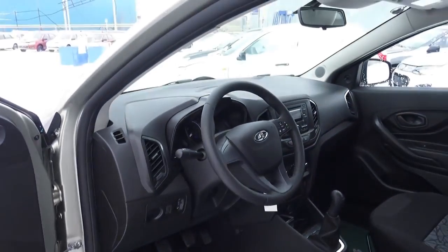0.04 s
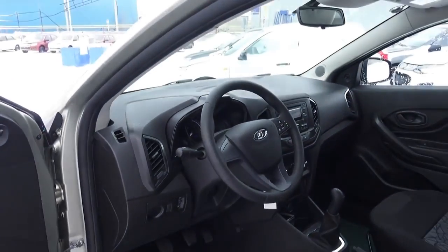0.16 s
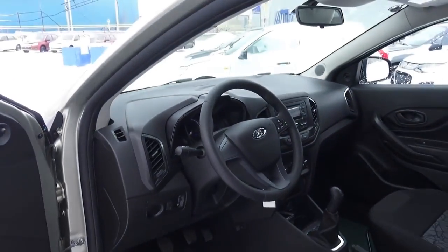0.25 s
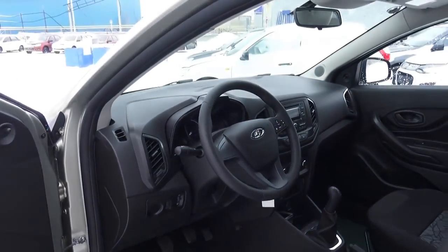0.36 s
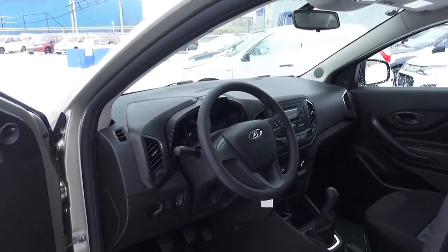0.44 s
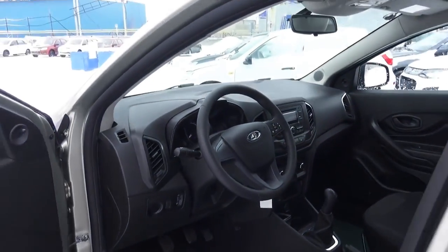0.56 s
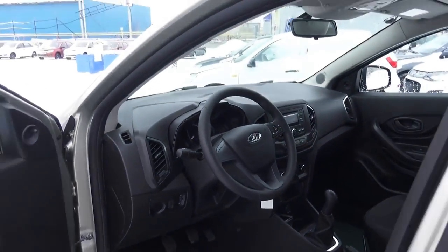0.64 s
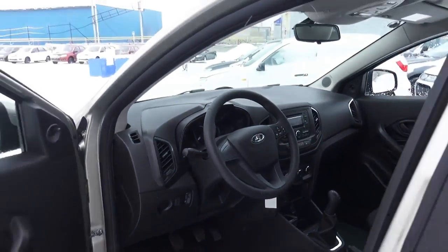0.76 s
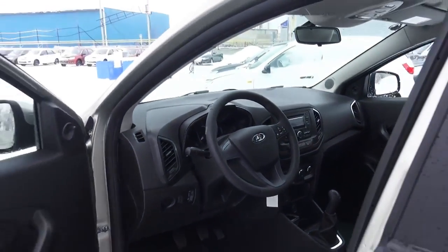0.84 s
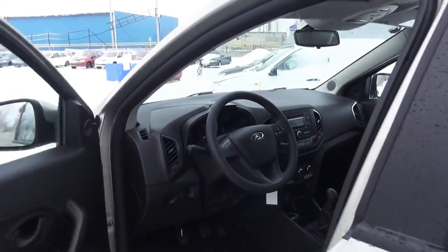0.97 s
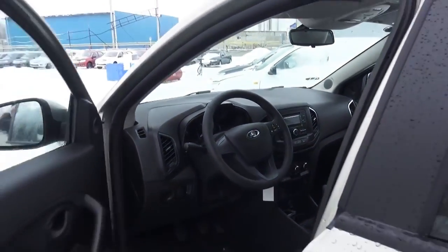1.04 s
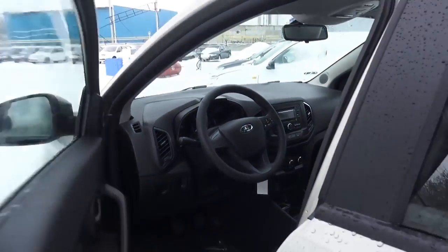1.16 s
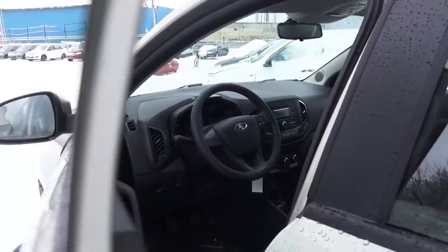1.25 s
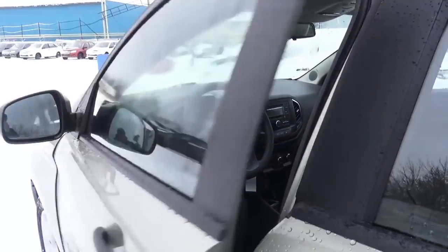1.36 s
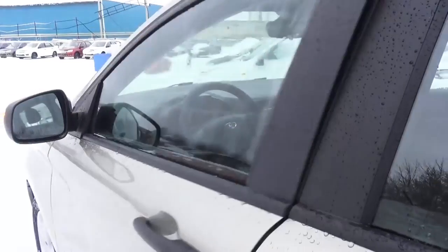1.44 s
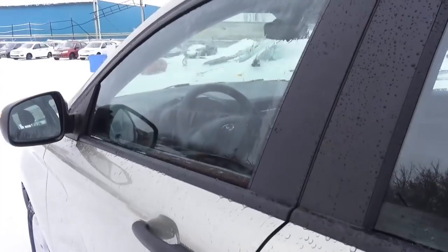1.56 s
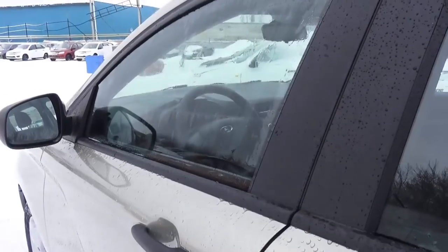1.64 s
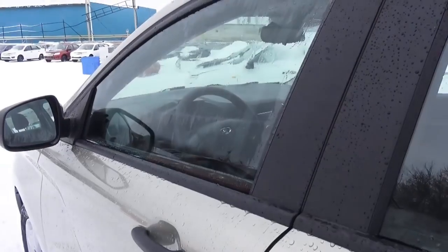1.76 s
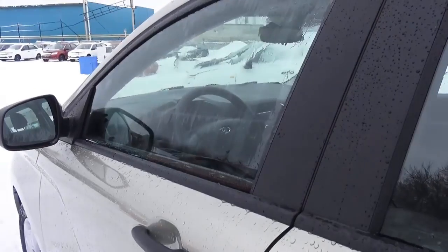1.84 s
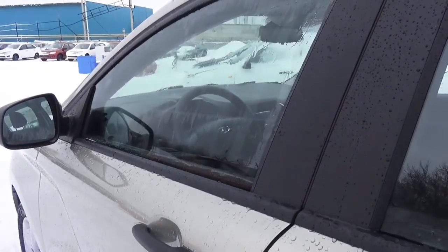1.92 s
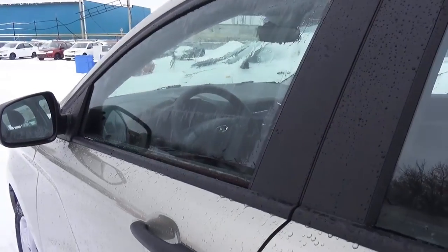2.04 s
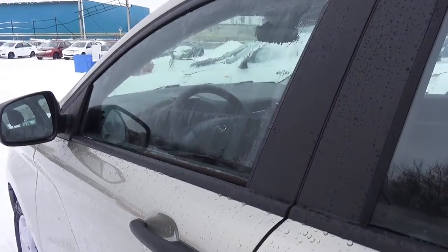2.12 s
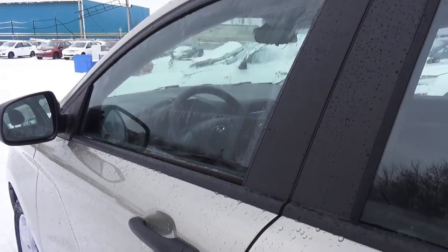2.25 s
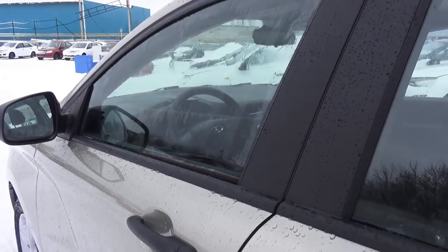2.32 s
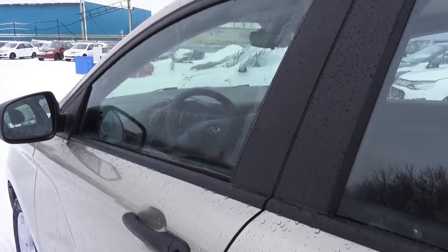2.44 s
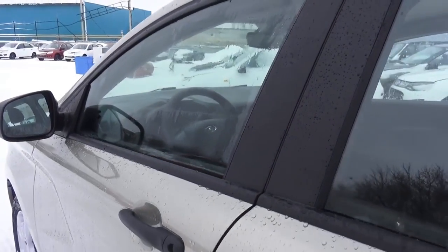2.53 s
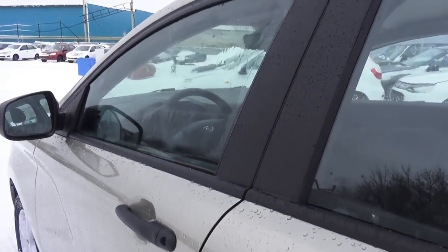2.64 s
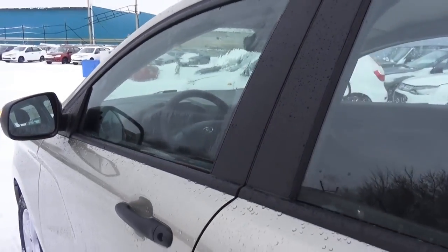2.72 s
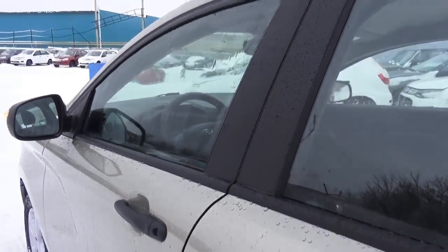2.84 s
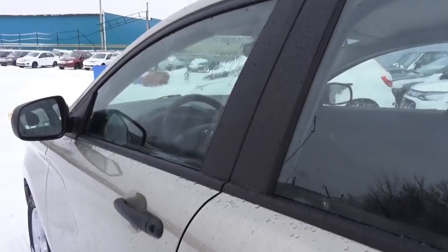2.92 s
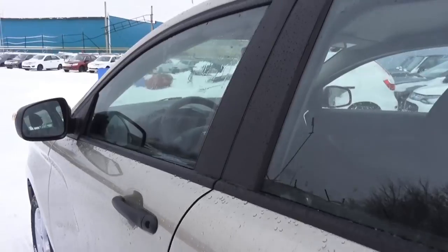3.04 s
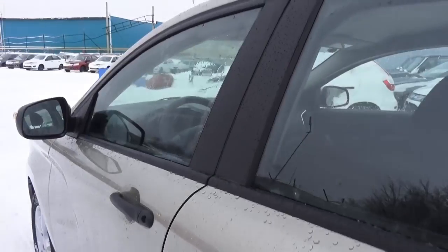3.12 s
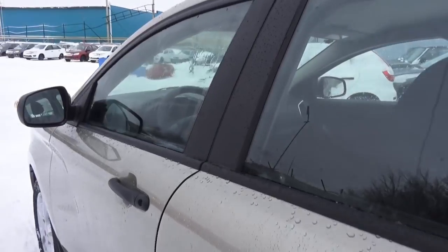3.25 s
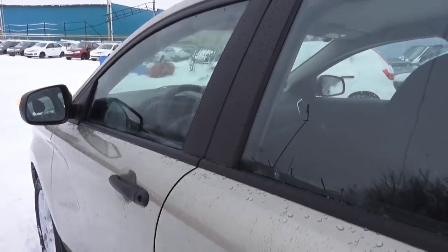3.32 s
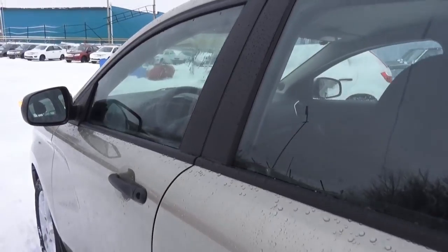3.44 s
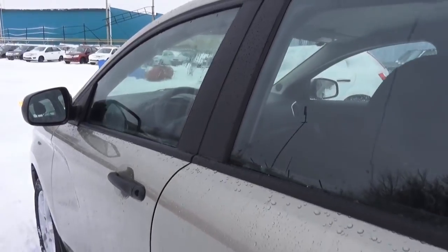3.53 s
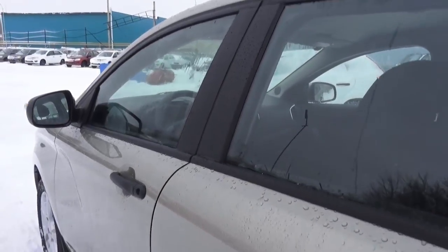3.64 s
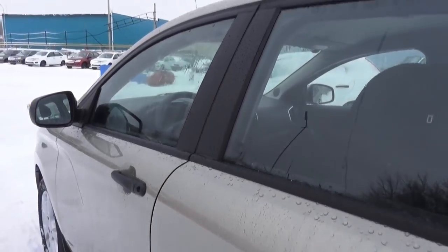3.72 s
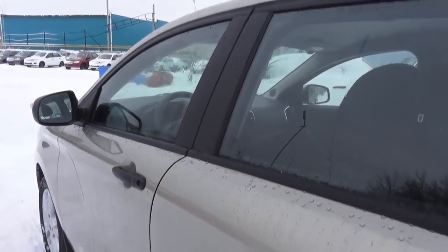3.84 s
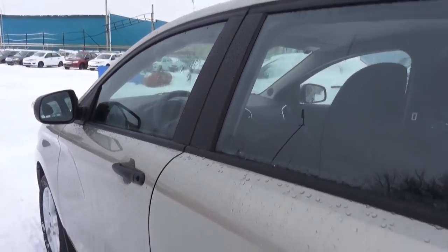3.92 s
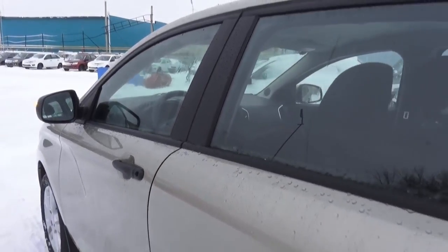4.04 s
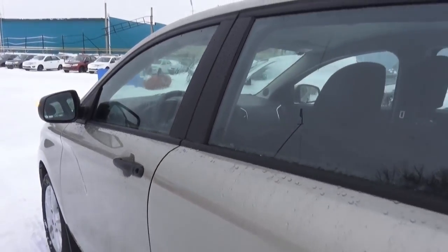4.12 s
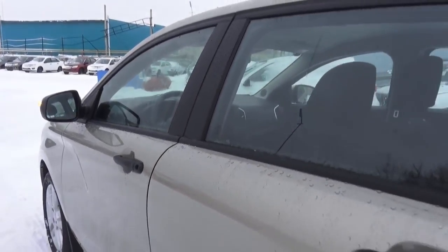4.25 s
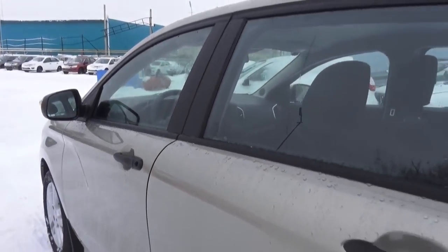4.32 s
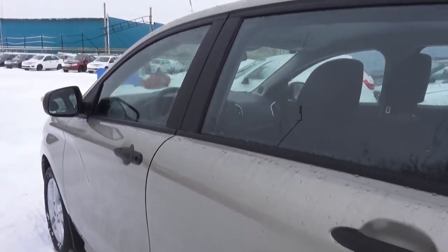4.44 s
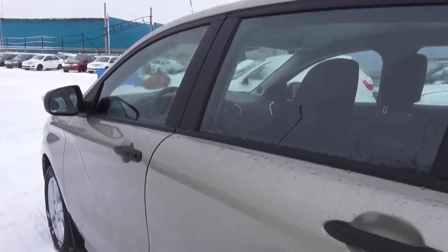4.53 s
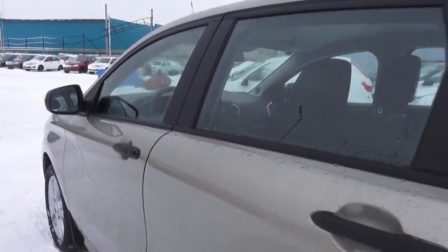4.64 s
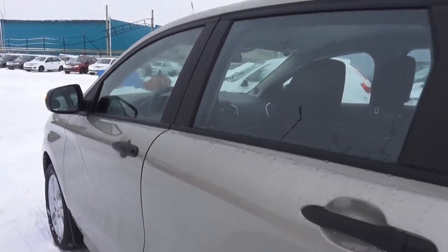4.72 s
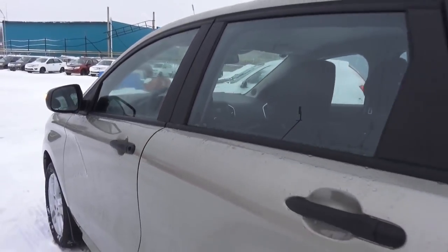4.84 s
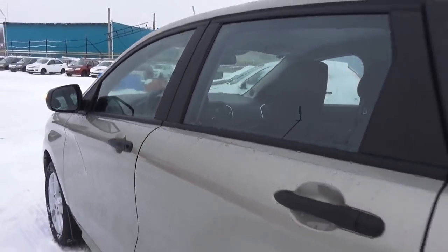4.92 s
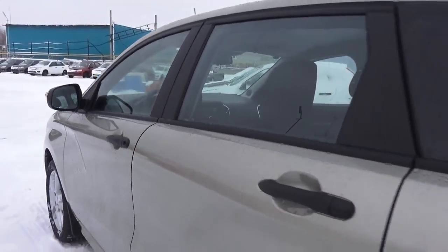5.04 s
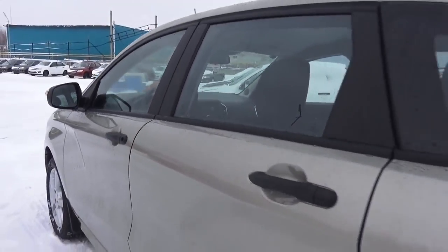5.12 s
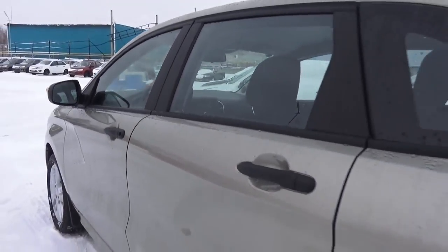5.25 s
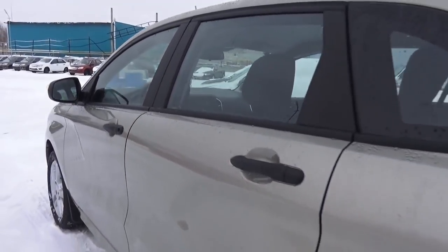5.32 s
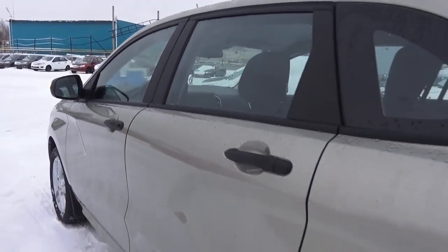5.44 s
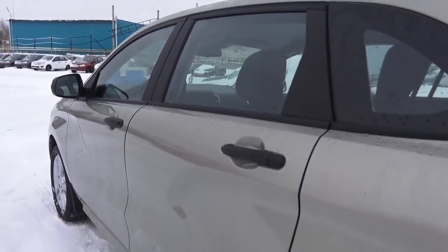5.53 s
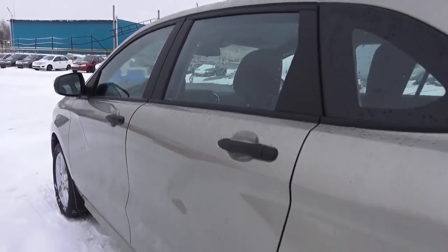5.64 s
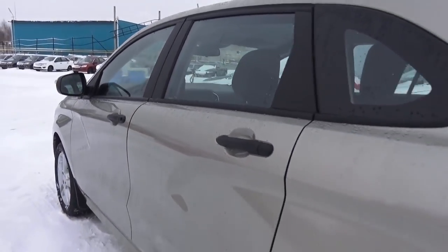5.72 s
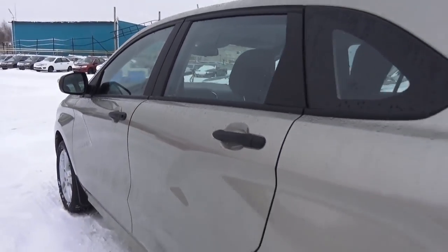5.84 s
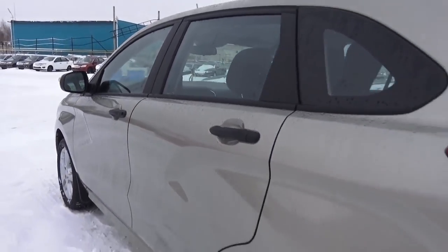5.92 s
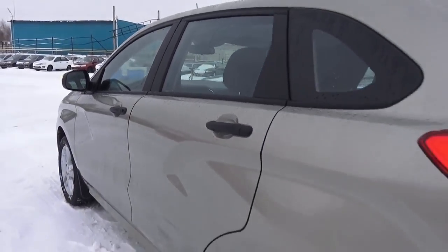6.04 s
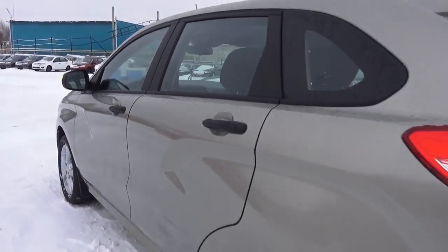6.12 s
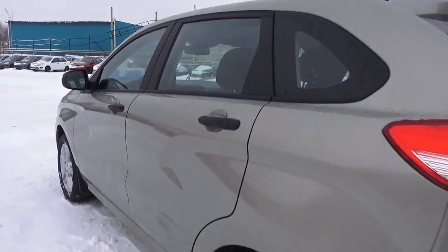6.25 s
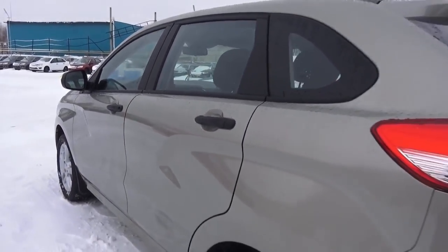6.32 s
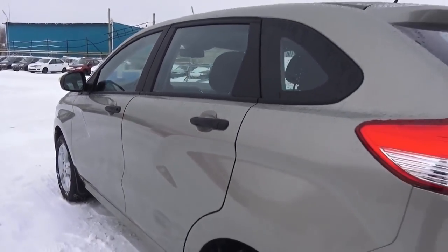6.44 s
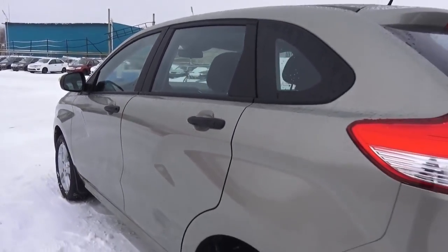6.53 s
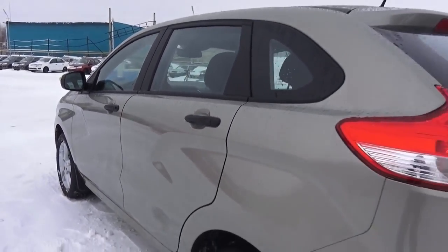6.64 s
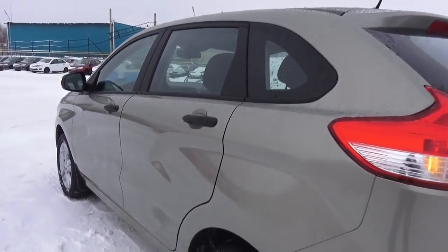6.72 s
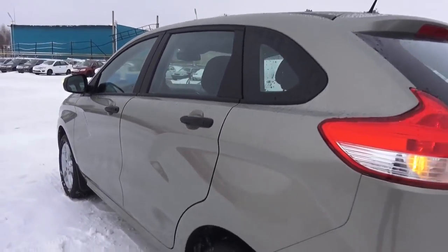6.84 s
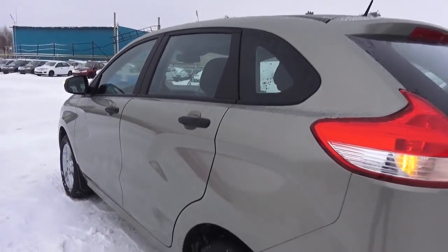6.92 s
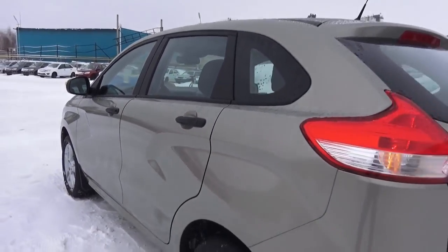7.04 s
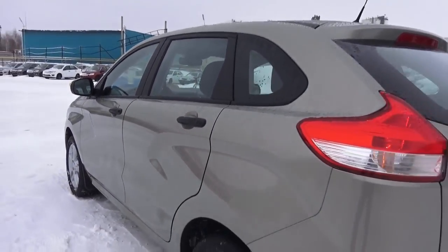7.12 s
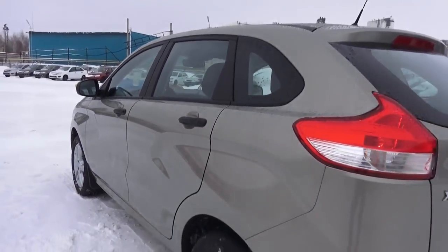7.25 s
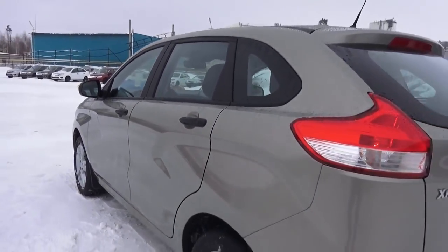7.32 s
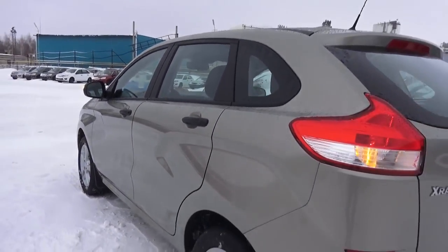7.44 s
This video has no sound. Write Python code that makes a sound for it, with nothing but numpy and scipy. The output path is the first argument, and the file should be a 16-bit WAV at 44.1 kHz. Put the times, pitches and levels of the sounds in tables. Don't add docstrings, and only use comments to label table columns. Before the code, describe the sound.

Steady low engine idle, a knocking door hinge and solid car door slam, then a slow walk along the car with gusts buffeting the microphone.

```python
import sys
import numpy as np
from scipy import signal
from scipy.fft import rfft, irfft, next_fast_len
from scipy.io import wavfile
from scipy.ndimage import map_coordinates

SR = 44100
rng = np.random.default_rng(int(sys.argv[2]) if len(sys.argv) > 2 else 0)


def store_wav(level_fs):
    pcm = np.round(np.clip(np.atleast_2d(level_fs), -1, 1) * 32767)
    wavfile.write(sys.argv[1], SR, pcm.T.astype(np.int16))


def ratio(d):
    e = np.asarray(d, float) / 20
    return 10 ** e


N = 329868
SIDES = np.array([[1], [-1]])


def unit(x):
    return x / np.sqrt(np.mean(x ** 2) + 1e-20)


def panned(left_right_db):
    return ratio(np.outer([0.5, -0.5], left_right_db))


def along(points, hz):
    f, v = np.transpose(points)
    return np.interp(np.log(hz + 1), np.log(f + 1), v)


def curves(rows):
    s, *cols = np.transpose(rows)
    return [np.interp(np.arange(N) / SR, s, c) for c in cols]


def wobble(rate):
    coarse = np.arange(0, N + 64, 32)
    knots = rng.standard_normal(int(N * rate / SR) + 6)
    return np.interp(np.arange(N), coarse, map_coordinates(knots, [coarse * rate / SR]))


def filtered(x, response):
    m = next_fast_len(N + 8192)
    return irfft(rfft(x, m) * response(np.fft.rfftfreq(m, 1 / SR)), m)[..., :N]


def resonance(hz, center_hz, width_hz):
    damping = 1j * hz * width_hz
    return damping / (center_hz ** 2 - hz ** 2 + damping)


# freq_hz, likeness (0 to 1)
PORT_LIKENESS = [(60, 1), (130, 0.92), (270, 0.92), (450, 0.94), (740, 0.87), (1300, 0.9), (1800, 0.9),
                 (2100, 0.97), (4400, 0.95), (5300, 0.44), (6500, 0.072), (9000, 0.18), (15000, 0.22)]


def rush(spectrum, gate=1):
    def response(hz):
        turn = np.arccos(np.clip(along(PORT_LIKENESS, hz), -1, 1)) / 2
        return ratio(along(spectrum, hz)) * [np.cos(turn), np.sin(turn)]

    mid, side = filtered(gate * rng.standard_normal((2, N)), response)
    return unit(np.array([mid + side, mid - side]))


def add(track, s, sound):
    part = track[..., round(s * SR):][..., :sound.shape[-1]]
    part += sound[..., :part.shape[-1]]


def ring(modes, attack, scatter_db):
    hz, db, t60 = np.transpose(modes)[:, :, None]
    t = np.arange(int(SR * t60.max())) / SR
    luck = rng.standard_normal((2, len(modes), 1))
    decay = ratio(db + scatter_db * luck[0] - 60 * t / t60)
    tones = decay * np.sin(2 * np.pi * hz * t + 0.92 * luck[1])
    return tones.sum(axis=0) * (1 - np.exp(-t / attack))


def swings(rows):
    s, db, hz, width = np.transpose(rows)[:, :, None]
    t = np.arange(-SR // 10, SR // 10) / SR
    bells = ratio(db) * np.exp(-.5 * (t / width) ** 2)
    out = np.zeros(N + SR)
    for at, swing in zip(s[:, 0], bells * np.cos(2 * np.pi * hz * t)):
        add(out, at, swing)
    return out[SR // 10:][:N]


# time_s, tailpipe_db, engine_bay_db, silencer_ring_db, tailpipe_left_right_db
WALK = [(0, -26, -43.5, -50, -.5), (.5, -25, -42.5, -56, 0), (.85, -23, -42.5, -46, -1),
        (1.3, -23.5, -42.5, -46, 0), (1.5, -22.5, -40.5, -48, 0), (1.95, -22.5, -42.5, -51, -0.5),
        (2.35, -22, -41.5, -52, 0.5), (2.75, -21, -41.5, -47, -0.2), (3.25, -21.5, -40, -46.5, .4),
        (3.7, -21, -40.5, -53, 0.5), (4.1, -20.5, -40, -47, 0.7), (4.7, -19.5, -39, -42.5, -0.5),
        (5.6, -19, -43, -50, -1.1), (6.1, -19.5, -43.5, -42, 0.5), (6.45, -21.5, -45, -45.5, -1),
        (6.65, -21.5, -43, -54, 1.5), (7.0, -21, -44, -46.5, -1), (7.48, -21, -45, -46, 1)]
# multiple_of_firing, level_db re second order
UPPER_ORDERS = [(4, -27), (5, -37.5), (6.5, -27)]
# freq_hz, density_db
ROAR = [(15, 0), (60, 1), (130, 1), (300, -1.5), (380, -1), (440, -5.5), (550, -4), (615, 1.5), (670, -9),
        (1000, -8), (1200, -40)]
# freq_hz, density_db
CLATTER = [(700, -33), (1100, -1), (1250, -0.5), (1330, 0), (1480, -5.5), (1650, -9), (2500, -16),
           (3700, -23), (4800, -49)]
# freq_hz, density_db
HISS = [(1300, -6), (2200, 0.5), (3600, -2.5), (4800, -10), (7000, -13.5), (7400, -8.5), (7750, -14.5),
        (9000, -14), (12000, -24.5), (14000, -32), (16000, -36)]
# freq_hz, width_hz, level_db
VALVE_COVER = [(1252, 43, 2), (1320, 40, -3.5), (1390, 48, -1.5)]
# freq_hz, width_hz, level_db
SILENCER = [(378, 14, -2), (606, 19, 5), (640, 46, -9.5)]


def engine():
    hum_db, bay_db, silencer_db, pan_db = curves(WALK)
    pipe, bay = hum_db + 21.5, bay_db + 42
    second_order_hz = 55.93
    turn = np.pi * np.cumsum(second_order_hz * (1 + 0.0038 * wobble(7.17))) / SR
    uneven = 1.1 * wobble(8)
    orders = np.sin(2 * turn)
    orders += ratio(-18.5 + 1.3 * uneven) * np.sin(turn)
    orders += ratio(-19.5 + 2.7 * wobble(6.0)) * np.sin(3 * turn)
    for k, db in UPPER_ORDERS:
        orders += ratio(db + uneven) * np.sin(k * turn)
    hum = np.sqrt(2) * ratio(hum_db + 0.32 * wobble(15)) * orders * panned(pan_db)

    def puff(depth_db, luck_db):
        return ratio(depth_db * np.cos(turn + 1.3) + luck_db * wobble(30))

    roar = ratio(-36 + 0.44 * bay + 0.26 * pipe) * rush(ROAR, puff(0.29, 0.78))
    clatter = ratio(bay_db - 2.5 - 0.05 * pipe) * rush(CLATTER, puff(0.72, 0.88))
    hiss = ratio(-49 + 0.75 * pipe + 0.14 * bay + 1.36 * wobble(6.4)) * rush(HISS, puff(0.14, 0.29))

    knocks = puff(2.0, 2.9) * rng.standard_normal(N)

    def rung(modes):
        return unit(filtered(knocks, lambda f: sum(ratio(db) * resonance(f, c, w) for c, w, db in modes)))

    metal = ratio(bay_db - 5) * rung(VALVE_COVER) + ratio(silencer_db) * rung(SILENCER)
    metal = metal + 0.18 * np.roll(metal, round(0.0007 * SR)) * SIDES
    return hum + roar + clatter + hiss + metal


# time_s, peak_db, bright_modes_db
STRAP_KNOCKS = [(1.068, -14, 3.5), (1.078, -18, 1), (1.089, -16, 4), (1.099, -16, 2), (1.118, -14.5, -3),
                (1.14, -20, 3), (1.152, -19, -2), (1.179, -22, -2), (1.196, -23, -2), (1.208, -23.5, 1),
                (1.234, -26, 2), (1.274, -24, -7), (1.300, -27, -2), (1.339, -27, 1), (1.363, -30, 6),
                (1.377, -31, 5), (1.397, -32, 1), (4.825, -24, -2)]
# freq_hz, level_db, t60_s
DOOR_SKIN = [(144, -5, 0.13), (184.6, 0, 0.14), (217, -5, 0.057), (273.5, 2.5, 0.1), (345, -6, 0.082),
             (394, -6.5, 0.083), (502, 1.5, 0.066), (560, 0.5, 0.057), (620, -2, 0.044), (720, -14, .03),
             (800, -24, .03)]
# time_s, peak_db, freq_hz, width_s
DRUMMING = [(1.0718, -14.5, 570, .004), (1.0718, -15.5, 284, .005), (1.083, -16, 170, 0.0054),
            (1.0875, -16, 235, 0.0042), (1.0915, -15, 480, 0.004), (1.0955, -13, 277, 0.0063),
            (1.1022, -12, 528, .0045), (1.113, -21, 403, .005), (1.121, -23, 230, 0.0067),
            (1.1085, -14, 185, .007), (1.118, -19, 160, .006), (1.078, -24, 720, .003),
            (1.124, -24, 450, .004), (1.128, -21, 130, .008), (1.1435, -24.5, 570, .0035),
            (1.158, -33, 597, 0.0074), (1.18, -31, 560, 0.0046), (1.205, -31, 535, .007),
            (1.279, -26, 300, 0.0075), (1.365, -33, 700, 0.0062), (1.379, -30, 430, 0.0055)]


def check_strap():
    strap = swings(DRUMMING)
    for s, db, bright_db in STRAP_KNOCKS:
        modes = [(hz, level + bright_db * (hz > 380), t60) for hz, level, t60 in DOOR_SKIN]
        add(strap, s, ratio(db - 8.5) * ring(modes, attack=0.0021, scatter_db=1.5))
    return strap


# time_s, level_db
PAWL_CATCHES = [
    (1.5188, -16.5),
    (1.5228, -17),
    (1.529, -19.5),
    (1.5433, -24),
]
# freq_hz, level_db, t60_s
PAWL = [(1250, -3.5, 0.024), (1383, 2, 0.031), (1530, -6, 0.038), (1750, -23, 0.025)]
# time_s, level_db
SHELL_BLOWS = [(1.507, -23), (1.529, -15), (1.548, -15), (1.564, -14.5), (1.576, -12), (1.598, -16),
               (1.618, -16.5), (1.649, -17), (1.669, -20), (1.688, -24), (1.71, -26), (1.744, -26.5),
               (1.766, -31)]
# freq_hz, level_db, t60_s
SHELL = [(33.3, -7, 0.22), (62, -19, 0.15), (82.8, -6, 0.29), (105, -11, 0.22), (126, -12, 0.27),
         (166.4, -2, 0.18), (213, -4, 0.17), (263, -3.5, 0.093), (302, -4, 0.077), (460, -5.5, 0.061),
         (630, -19, 0.035)]
# time_s, peak_db, freq_hz, width_s
SLAM_SWINGS = [(1.587, -7, 60, 0.0075), (1.6105, -13, 95, .006), (1.635, -18, 99, .008),
               (1.785, -21, 56, .011), (1.6225, -9, 58, 0.009), (1.645, -21, 252, 0.0073),
               (1.657, -13, 40, .013), (1.535, -20.5, 560, .004), (1.55, -21, 480, .003),
               (1.565, -22, 520, .004), (1.5765, -13, 336, .004), (1.596, -20, 500, 0.0055),
               (1.6, -28, 620, .005), (1.622, -29, 483, 0.0064), (1.775, -35, 500, .008),
               (1.605, -22, 280, .008), (1.63, -24, 360, .008), (1.675, -22, 270, .01),
               (1.61, -30, 880, .006), (1.72, -30, 300, 0.014), (1.66, -20.5, 170, 0.011),
               (1.69, -18.5, 159, .009), (1.709, -20, 74, .008), (1.747, -16.5, 65, .009),
               (1.764, -20, 70, .008)]


def slam_body():
    body = swings(SLAM_SWINGS)
    for s, db in PAWL_CATCHES:
        add(body, s, ratio(db) * ring(PAWL, attack=0.00017, scatter_db=-2.5))
    for s, db in SHELL_BLOWS:
        add(body, s, ratio(db - 3) * ring(SHELL, attack=0.002, scatter_db=3))
    return body


# time_s, peak_db, edge_db, fizz_db, t60_s
LATCH_CONTACTS = [(1.495, -30.5, -9, -8, 0.4), (1.507, -26.5, -4, -10, 0.56), (1.5184, -15, 3, -16, 0.034),
                  (1.524, -14.5, -16, -10, 0.053), (1.527, -15, -2, -13, 0.053), (1.535, -20, 1, 1, 0.1),
                  (1.5435, -17.5, 0.5, 4, 0.065), (1.549, -20, 2, 1, 0.049), (1.5561, -16, 0, 4, 0.055),
                  (1.561, -24, 0, -6, 0.048), (1.567, -20, -6, -26, 0.14), (1.5925, -16.5, -4, -6, 0.028),
                  (1.5947, -21.5, 4, 1, 0.035), (1.612, -31, -17, -22, .08), (1.651, -39, -15, -17, 0.089),
                  (1.7, -40, -2, -10, 0.15), (1.74, -42, 1, -4, 0.091)]
# time_s, level_db, edge_db
STEEL_CRACKS = [(1.5194, -13, -3), (1.5245, -11, -10), (1.5302, -13, -5), (1.5337, -20, 0),
                (1.5427, -15, -6), (1.5475, -15, -3), (1.5566, -23, -2), (1.5605, -13, 2), (1.5648, -19, 0),
                (1.5708, -24, -8), (1.5922, -15, 0), (1.595, -17, -3)]
# freq_hz, width_hz, level_db
STRIKER = [(410, 130, 3), (820, 580, -4), (1285, 560, -2.5), (1900, 850, -9.5), (2550, 580, -2.5),
           (4230, 1050, -4.5), (5540, 560, -9), (9000, 2800, -13)]


def latch():
    rasps = np.zeros((4, N))
    t = np.arange(SR // 5) / SR
    for s, db, edge_db, fizz_db, t60 in LATCH_CONTACTS:
        shares = ratio([[0], [edge_db], [fizz_db], [fizz_db]])
        add(rasps, s, ratio(db - 60 * t / t60) * shares * rng.standard_normal((4, len(t))))
    for s, db, edge_db in STEEL_CRACKS:
        shares = ratio([[0], [edge_db + 3.5], [edge_db], [edge_db - 6]])
        crack = np.sign(rng.standard_normal((4, len(t))))
        add(rasps, s, ratio(db + 6.5 - 60 * t / 0.0016) * shares * crack)

    def through_steel(noise, modes):
        def response(f):
            modal = sum((-1) ** k * ratio(db) * resonance(f, c, w) for k, (c, w, db) in enumerate(modes))
            return modal / (1 + (f / 12500) ** 14)
        return filtered(noise, response)

    near = ratio(12.5) * through_steel(rasps[0], STRIKER[:4])
    near += ratio(5.0) * through_steel(rasps[1], STRIKER[4:6])
    fizz, spread = ratio(3.0) * through_steel(rasps[2:], STRIKER[6:])
    return near, fizz, spread


def door():
    strap = check_strap()
    contact, fizz, spread = latch()
    near = slam_body() + contact
    echo = np.roll(near + strap, round(0.00158 * SR))
    wide = (.5 * spread + 0.062 * echo) * SIDES
    return near * panned(-0.5) + strap * panned(3) + fizz + wide


# time_s, peak_db, lower_hz, upper_hz, upper_db
RELAY = [(0.305, -39, 3420, 6500, -20), (.637, -32.5, 2120, 3800, -2), (0.978, -38, 2320, 3420, 1.5),
         (1.3159, -32.5, 1945, 3800, -12), (3.043, -28.5, 1980, 3250, -7), (2.584, -35.5, 2320, 4450, -12),
         (3.298, -39, 1700, 2550, 2), (3.309, -43, 3280, 2600, -3), (3.333, -38, 3220, 5500, -15),
         (3.343, -38, 3230, 5500, -12), (3.357, -40, 2900, 3700, -2), (3.454, -32, 2080, 3500, -12),
         (3.7299, -37, 1950, 3700, -12), (4.2597, -45, 1950, 3700, -6), (4.6414, -35, 1510, 2950, -18),
         (5.1492, -41, 1900, 3600, -12), (5.8865, -42, 1860, 3500, -3)]
# time_s, peak_db, freq_hz, width_s
CHATTER = [(.012, -40.5, 2300, 0.0024), (.309, -45, 3700, .004), (.6395, -32, 2140, .0025),
           (.643, -33, 2050, .002), (.642, -31, 4050, 0.0018), (.645, -40, 4150, .003),
           (1.323, -37, 2000, .003), (1.3235, -38, 4000, .002), (2.002, -38, 1900, .001),
           (2.053, -43, 2500, .002), (2.694, -31.5, 850, .003), (2.696, -37, 1400, .003),
           (3.339, -41, 3250, .005), (3.603, -32, 1260, .004), (4.6445, -27, 1430, .002)]


def relay():
    out = swings(CHATTER)
    for s, db, hz, upper_hz, upper_db in RELAY:
        modes = [(0.88 * hz, -5, .02), (hz, 0, .025), (1.084 * hz, -6, .015),
                 (0.933 * upper_hz, upper_db - 1, .012), (upper_hz, upper_db, .018),
                 (1.07 * upper_hz, upper_db - 8, .014), (4.3 * hz, upper_db - 13, .012)]
        add(out, s, ratio(db + 5.5) * ring(modes, attack=0.0012, scatter_db=2.2))
    return out


# time_s, peak_db, center_hz, spread_factor, left_right_db
SNAPS = [(.6285, -39, 9000, 1.5, -4), (1.18, -37.5, 9500, 1.26, 1.5), (2.001, -35, 3600, 1.8, 2),
         (2.0525, -37, 3495, 1.63, 7), (2.288, -37, 4000, 1.6, 6), (2.585, -29, 4500, 2.4, 6),
         (2.691, -17.5, 12100, 1.27, -15), (2.9543, -41, 7500, 1.2, 0), (3.1085, -41, 8000, 1.08, -5),
         (3.1916, -33, 9000, 1.62, -6), (3.2979, -38, 8060, 0.99, -4), (3.358, -38, 5000, 1.8, 0),
         (3.668, -34, 4000, 1.6, 3), (3.7306, -32, 10300, 1.08, 2), (3.8394, -48, 13000, 1.1, 0),
         (4.262, -38, 5390, 1, 4), (4.61, -42, 6950, 2, .5), (5.1491, -29, 12900, 1.34, 7),
         (6.3145, -34, 8000, 1.8, 1), (6.4793, -34, 7980, 1.23, 0), (6.655, -34, 9000, 1.74, 1),
         (6.9422, -17.5, 3600, 2.3, -1), (6.9425, -27, 9000, 1.44, -14), (2.69, -31, 1600, 2.2, -3),
         (2.7, -35, 3000, 1.5, 0)]


def snaps():
    out = np.zeros((2, N))
    t = np.arange(SR // 50) / SR
    for s, db, hz, spread, pan_db in SNAPS:
        spark = rng.standard_normal(len(t)) * ratio(-60 * t / 0.0074) * 0.092 + (t == 0)
        factor = max(spread, 1.05)
        band = [hz / factor, min(hz * factor, 20000)]
        spark = signal.lfilter(*signal.butter(2, band, "band", fs=SR), spark)
        spark = signal.lfilter(*signal.butter(1, hz * 0.71, fs=SR), spark)
        add(out, s, ratio(db) * spark / np.abs(spark).max() * panned(pan_db))
    return out


# time_s, half_length_s, level_db
STEPS = [(3.0, .15, -55), (7.4, .12, -55), (0, 0.17, -54), (1.85, 0.16, -59.5), (.75, 1, -53),
         (1.193, 0.063, -52.5), (1.398, 0.12, -50), (2.552, 0.29, -54), (3.34, 0.1, -49),
         (4.801, 0.31, -54), (5.522, 0.17, -52.5), (6.203, 0.091, -54), (6.85, 0.46, -52)]


def footsteps():
    s = np.arange(N) / SR
    weight = sum(ratio(db) * np.exp(-2 * ((s - at) / half) ** 2) for at, half, db in STEPS)
    grains = ratio(2.6 * wobble(300))
    snow = [(1200, -23), (2500, 4.5), (5000, -3.0), (9000, -5.0), (13000, -12), (16000, -30)]  # Hz, dB
    return weight * rush(snow, grains)


# start_s, hold_s, thump_db, ragged_edge_db
GUSTS = [(0.475, 0.047, -38, -48), (0.75, 0.034, -37, -42), (0.852, 0.67, -48, -38),
         (1.58, 0.12, -33, -33.5), (1.74, 0.035, -34.5, -39), (4.828, 0.0093, -30, -37),
         (4.932, 0.035, -34, -39), (5.657, 0.081, -31, -30.5), (5.922, 0.039, -28, -38.5),
         (5.986, 0.07, -30, -37.5), (6.09, .06, -33, -36.5), (6.214, .04, -24, -39),
         (6.274, .015, -22, -32.5), (6.337, 0.0094, -25.5, -29), (6.402, 0.019, -22, -38),
         (6.466, 0.07, -22.5, -31.5), (6.614, 0.043, -24.5, -36), (6.738, 0.075, -35.5, -44),
         (6.895, 0.1, -28, -41.5), (7.149, 0.072, -26, -41), (7.258, 0.024, -27.5, -49),
         (7.338, 0.014, -26, -43), (7.41, 0.083, -31, -34.5)]
# freq_hz, density_db
BUFFET = [(8, -4), (28, 5), (50, 2.5), (90, 0.5), (140, -5), (250, -19), (500, -52), (1000, -77)]
# freq_hz, density_db
SPATTER = [(60, -30), (150, 4.5), (300, -1.5), (450, -10.5), (700, -13), (1500, -48)]
# time_s, peak_db, freq_hz, width_s
EDDIES = [(4.83, -19, 75, 0.0053), (4.835, -22.5, 236, 0.0044), (4.832, -29, 380, .004),
          (6.022, -31, 580, .005), (6.105, -32, 626, .008), (6.135, -33, 550, .008),
          (6.02, -22, 130, 0.0048), (6.055, -21.5, 160, .006), (6.28, -26.5, 326, 0.0048),
          (6.335, -30, 590, .005), (6.37, -33, 636, .009), (6.412, -29, 480, 0.0027),
          (6.49, -28, 445, 0.0039), (6.655, -24.5, 247, 0.007), (5.7, -23.5, 142, .015),
          (5.68, -25, 300, 0.0057), (5.745, -23.5, 285, 0.0038), (5.97, -21, 190, 0.0073),
          (6.355, -21.5, 272, 0.0055), (6.495, -22, 207, .006), (6.5, -21, 70, 0.013),
          (6.047, -21, 130, 0.0075), (6.9, -19, 110, .008), (6.41, -20, 110, 0.0064),
          (6.294, -7, 62.4, 0.018), (6.66, -32, 615, .006), (7.3, -19, 105, .015), (5.925, -22, 150, .007),
          (5.985, -21, 130, .008), (6.245, -22, 150, .008), (6.551, -14, 92.3, 0.031),
          (7.205, -15.5, 77, 0.012), (7.429, -11.5, 72, 0.016)]


def wind():
    start, hold, thump_db, edge_db = np.transpose(GUSTS)[:, :, None]
    s = np.arange(0, N + 64, 32) / SR
    rise_db_s, fall_db_s = 448, 303
    shape_db = -rise_db_s * np.clip(start - s, 0, None) - fall_db_s * np.clip(s - start - hold, 0, None)

    def blown(db):
        power = ratio(2 * (db + shape_db)).sum(axis=0)
        return np.interp(np.arange(N) / SR, s, np.sqrt(power))

    calm = ratio(-41.5)
    thump = ratio(4.0) * (blown(thump_db) + calm) * rush(BUFFET, ratio(1.55 * wobble(25)))
    ragged = ratio(0.5) * blown(edge_db) * rush(SPATTER, ratio(2.4 * wobble(45)))
    return thump + ragged + swings(EDDIES)


def belt():
    center_hz, width_hz, clearest_s, half_s = 7430, 300, 4.85, .9
    air = rng.standard_normal((2, N))
    whistle = filtered(air, lambda hz: 1 / (1 + ((hz - center_hz) / width_hz * 2) ** 4))
    swell = np.exp(-((np.arange(N) / SR - clearest_s) / half_s) ** 2)
    return ratio(-65 + 1.5 * wobble(4)) * swell * unit(whistle)


def scene():
    slam_s, duck_db, recover_s = 1.54, 5, 0.4
    since = np.arange(N) / SR - slam_s
    gain_db = -duck_db * np.clip(since / 0.024, 0, 1) * np.exp(-np.clip(since, 0, None) / recover_s)
    return ratio(gain_db) * engine() + door() + relay() + snaps() + footsteps() + wind() + belt()


def top_cut(x):
    return signal.sosfilt(signal.butter(12, 16300, fs=SR, output="sos"), x)


# freq_hz, left_right_db
PORT_BALANCE = [(60, 2.5), (110, 4), (200, -2), (380, 1.5), (700, 1), (1290, -2.5), (2380, 0.5),
                (4400, 1.5), (8120, 0.5), (15000, 0.5)]


def record(dry):
    squeezed = dry / (1 + np.abs(dry / 0.58) ** 4) ** (1 / 4)
    padded = np.pad(squeezed, [(0, 0), (0, SR // 20)], "reflect")
    leaning = filtered(padded, lambda hz: panned(along(PORT_BALANCE, hz)) / (1 + (hz / 15150) ** 44))
    faded = leaning * np.clip((N - np.arange(N)) / (.004 * SR), 0, 1)
    return top_cut(faded)


dry = scene()
out = record(dry)
store_wav(out)
```